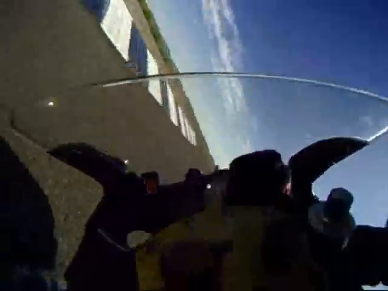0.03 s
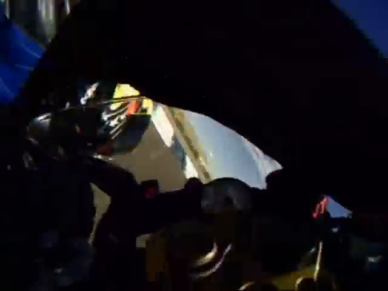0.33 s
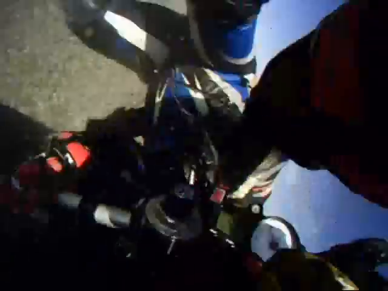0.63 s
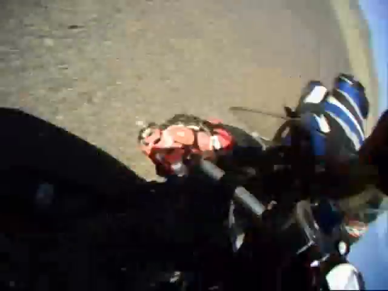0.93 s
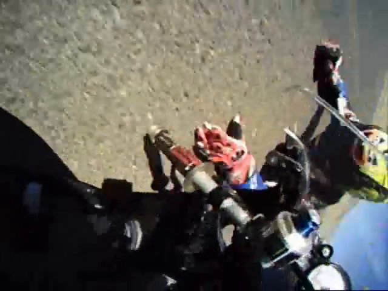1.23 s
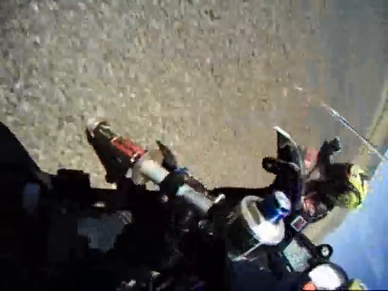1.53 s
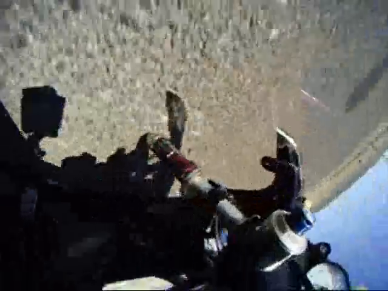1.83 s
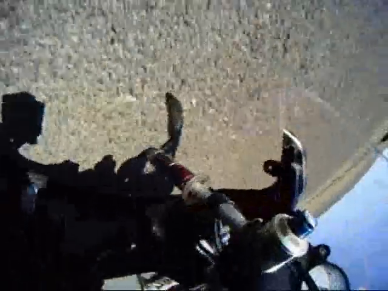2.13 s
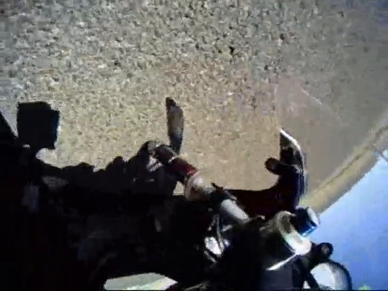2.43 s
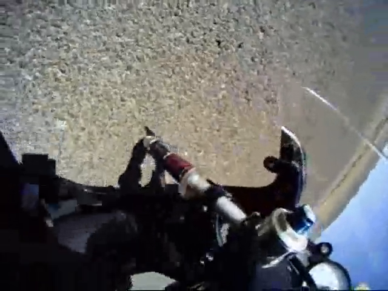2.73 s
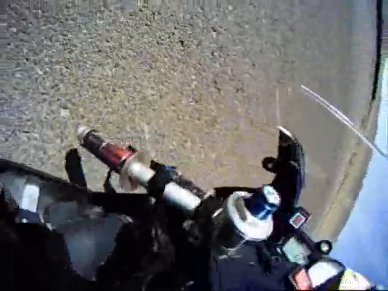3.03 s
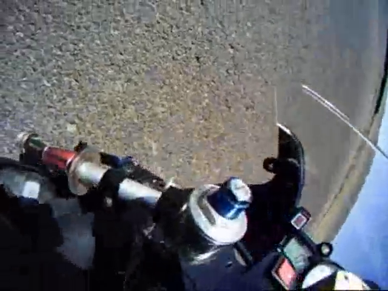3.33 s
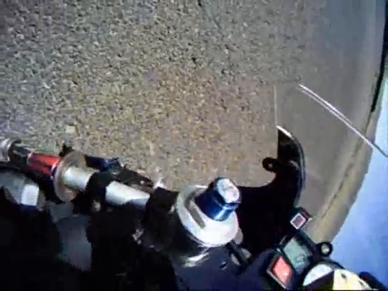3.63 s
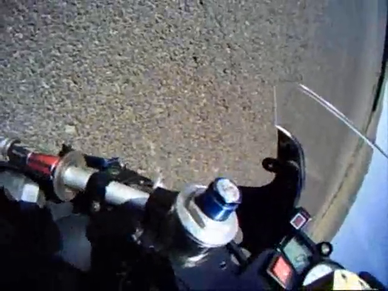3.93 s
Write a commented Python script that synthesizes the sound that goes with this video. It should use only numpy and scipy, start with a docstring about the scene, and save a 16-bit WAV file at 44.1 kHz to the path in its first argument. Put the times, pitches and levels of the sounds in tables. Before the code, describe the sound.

A motorcycle crashes and slides on asphalt, heard from on the bike. Wind and a fast, crackling judder overload the microphone until 0.5 seconds, when crunching slams begin, choking the sound between blows. From 1 second metal grinds and rattles over booming bodywork, squealing briefly around 1.2 and scraping hardest near 1.6. After 2 seconds the slide breaks into separate scrapes and low bumps, dying away by 4 seconds.

```python
"""A racing motorcycle falls and slides along asphalt, heard from a camera on the bike.
First wind and a fast judder overload the microphone. From half a second the bike slams down in a run
of blows that choke the sound, and an edge gouges the track. From one second the dragged metal grinds,
rings and briefly squeals while the bodywork booms. Last, the bike bumps and rocks to rest."""
import sys
import numpy as np
from scipy.fft import rfft, irfft, next_fast_len
from scipy.io import wavfile
from scipy.ndimage import map_coordinates

SR = 44100
rng = np.random.default_rng(int(sys.argv[2]) if len(sys.argv) > 2 else 0)


def wrap_up_sound(samples):
    """Save the sound to the file named by the first command line argument, as 16-bit audio."""
    columns = np.atleast_2d(samples).T
    # keep every value between -1 and 1, then stretch to whole-number steps
    tamed = np.clip(columns, -1, 1)
    steps = np.round(tamed * 32767).astype(np.int16)
    wavfile.write(sys.argv[1], SR, steps)


N = 176400

# The bike bumps on its side. Each row: start in seconds, swing in dB, time to fall 60 dB in seconds.
BUMPS = [(1.887, -35, 0.091), (2.075, -19, 1), (2.551, -1, 0.047), (2.587, -9, 0.095), (2.709, -10, 0.18),
         (2.772, -3.5, 0.13), (2.96, -2, 0.12), (3.029, -10.5, 0.31), (3.312, -11, 0.25),
         (3.379, -6.5, 0.59), (3.592, -23, 0.23), (3.721, -21, 0.42)]
# Spectrum of crunching and gouging. Each row: frequency in Hz, level in dB.
CRUNCH_SPECTRUM = [(100, 3), (400, 3), (1500, -2.5), (3500, -7.5), (6000, -17), (12000, -20.5)]


def slide():
    """Sliding friction: bumps and snags raise the contact pressure, and with it grinding and rattle."""
    # Course of the slide. Each row: time in seconds, grinding in dB, boom in dB.
    levels = [(1.03, -26, -13), (1.46, -27.5, -15), (1.51, -19.5, -8.5), (1.55, -30, -18.5),
              (1.59, -23, -6), (1.69, -22, -8.5), (1.77, -31, -18), (1.95, -32, -13.5), (2.02, -43, -31),
              (2.12, -37, -20), (2.34, -43.5, -27), (2.39, -30.5, -15), (2.5, -54.5, -36.5),
              (2.78, -56, -36), (2.93, -68.5, -61.5), (2.98, -36.5, -19), (3.06, -35, -19),
              (3.18, -67.5, -49.5), (3.32, -60.5, -49.5), (3.39, -33.5, -17), (3.51, -53.5, -41.5),
              (4, -61.5, -57)]
    # The metal snags on stones. Each row: start in seconds, level in dB.
    stones = [(1.134, -14), (1.424, -6.5), (1.610, -6), (1.677, -15), (1.695, -14.5), (1.894, -13.5),
              (1.901, -33), (1.953, -15.5), (2.040, -24.5), (2.081, -19), (2.121, -22), (2.145, -19.5),
              (2.232, -17), (2.375, -13), (2.419, -21), (2.981, -24), (3.036, -21.5), (3.053, -17),
              (3.359, -17.5), (3.379, -12), (3.402, -21), (3.422, -23.5)]
    grind_db, boom_db = curves(levels)
    landing = amp(73.5 * np.minimum(clock() - 0.99, 0))  # swells until 0.99 s
    scrapes = sum(amp(db - 31) * surge(s, rise_s=0.0032, fall_s=0.012) for s, db, _ in BUMPS)
    snags = sum(amp(db) * surge(s, rise_s=0.00098, fall_s=0.0036) for s, db in stones)
    pressure = amp(grind_db) + scrapes + snags
    flex, boom = bodywork()
    return landing * (pressure * grinding(flex) + rattle(pressure) + amp(boom_db) * boom)


def bodywork():
    """Panel vibration: the bodywork flexes at a wandering pitch. Returns the flexing and its boom."""
    # Centre pitch of the boom. Each row: time in seconds, frequency in Hz.
    pitches = [(1.03, 128), (1.66, 124.2), (1.77, 90), (3.03, 124.7), (3.4, 129.8)]
    # Rumble of the bodywork. Each row: frequency in Hz, level in dB.
    spectrum = [(30, -7), (70, 2), (150, 1), (220, -11.5), (320, -18), (1500, -55)]
    hz, = curves(pitches)
    flex = np.sin(2 * np.pi * np.cumsum(hz * (1 + 0.2007 * wobble(70))) / SR)
    tone = unit(flex * amp(2.7 * wobble(40)))
    return flex, amp(-2) * tone + amp(-1) * noise(spectrum)


def grinding(flex):
    """Forced resonance: stones rasp and ring the dragged metal, modulated by the flexing bodywork."""
    # Rasp of the asphalt. Each row: frequency in Hz, level in dB.
    spectrum = [(150, -2.5), (300, 1.5), (750, -8), (1000, -7), (1500, -2.5), (2500, -6.5), (4000, -16.5),
                (6000, -14), (12000, -33)]
    # Modes of the dragged parts. Each row: frequency in Hz, bandwidth in Hz, level in dB.
    modes = [(744, 61, -0.5), (1170, 76, -4.5), (1590, 33, 2.5), (2415, 145, -7), (5510, 390, -16),
             (6450, 55, -13), (7930, 34, -7.5), (9570, 130, -12.5), (10260, 400, -16)]
    rasp = grit(per_s=2500, spread_db=12) + 0.98 * rng.standard_normal(N)
    rasp *= amp(3.5 * flex + 5 * np.tanh(wobble(110)))  # chatter
    return amp(-2.5) * coloured(rasp, spectrum) + amp(-7.5) * ringing(rasp, modes)


def impacts():
    """Impulsive forces: slams push in alternate directions. Returns thuds and the crunch envelope."""
    # The bike hits the track. Each row: start in seconds, thud in dB, crunch in dB.
    slams = [(.533, 0.5, -12.5), (.567, -0.5, -11.5), (.590, -9.5, -19.5), (.689, 6, -15.5),
             (.694, 1.5, -12), (.702, -7, -9), (.735, -0.5, -9.5), (.778, -1.5, -18.5), (.799, -10, -20),
             (.805, 1, -10.5), (.843, 1.5, -16.5), (.919, -2.5, -16), (.945, -4, -6.5), (.954, 1.5, -24),
             (.961, -9, -17.5), (.981, 3, -29.5), (.992, -16, -11), (1.010, -0.5, -10), (1.031, -9, -19),
             (1.044, -4.5, -13), (1.927, 6.5, -14), (2.145, -4, -34), (2.373, -0.5, -18.5)]
    # Jolts overload the microphone with sharp cracks. Each row: start in seconds, level in dB.
    cracks = [(0.096, -13), (.130, -14.5), (0.171, -11), (0.187, -6.5), (.262, -8), (0.304, -12.5),
              (0.336, -9.5), (0.352, -7.5), (0.36, -10.5), (.373, -8.5), (0.393, -6), (.411, -6.5),
              (0.426, -11), (0.452, -7), (0.466, -7.5), (1.503, -11.5), (1.511, -10), (1.518, -5.5),
              (1.575, -8.5), (1.585, -11), (1.594, -7), (1.639, -9), (1.655, -11.5), (1.660, -5.5),
              (1.665, -8), (1.673, -9), (1.699, -14)]
    # Hollow knocks of the bodywork. Each row: start in seconds, frequency in Hz, level in dB.
    knocks = [(.567, 414, -3.5), (.778, 285, -8), (.919, 580, -8.5)]
    rise_s, hold_s, fall_s = 0.0011, 0.0027, 0.001
    crunch_s, crack_s, knock_s = 0.0034, 0.0024, 0.0017
    thuds, bursts = np.zeros(N), np.zeros(N)
    t = np.arange(SR // 10) / SR
    push = np.minimum(t / rise_s, 1) * np.exp(-np.maximum(t - hold_s, 0) / fall_s)
    knock_envelope = t / knock_s * np.exp(1 - t / knock_s)
    for k, (s, thud_db, crunch_db) in enumerate(slams):
        thuds[round(s * SR):][:len(t)] -= (-1) ** k * amp(thud_db) * push
        bursts[round(s * SR):][:len(t)] += amp(crunch_db) * np.exp(-(t / crunch_s) ** 4)
    for s, db in cracks:
        bursts[round(s * SR):][:len(t)] += amp(db) * np.exp(-(t / crack_s) ** 4)
    for s, hz, db in knocks:
        thuds[round(s * SR):][:len(t)] += amp(db) * np.sin(2 * np.pi * hz * t) * knock_envelope
    return highpass(thuds, corner_hz=34.8), bursts  # each push springs back


def judder_and_wind():
    """Saturation: judder drives the microphone to its stop, thumping and muffling the rush of air."""
    # Overdrive of the microphone. Each row: time in seconds, drive in dB.
    drive = [(0, 8), (.08, 8), (.22, 7.5), (.29, 18.5), (.42, 14), (.48, -2.5), (.54, -10.5)]
    # Rush of air and road. Each row: time in seconds, level in dB.
    rush_levels = [(0, -22), (.08, -14), (.25, -16.5), (.4, -10), (0.518, -20.5), (.56, -29.5),
                   (0.662, -24.5), (.8, -23), (.89, -33), (.96, -54), (1.03, -21), (1.15, -45)]
    # Spectrum of the rush. Each row: frequency in Hz, level in dB.
    spectrum = [(60, -6.5), (170, 4.5), (450, -6.5), (900, -10), (1600, -12.5), (2500, -13.5), (4000, -25),
                (6000, -21), (12000, -29.5)]
    start_s, end_s, judder_hz = 0.0205, 0.545, 26.9
    drive_db, = curves(drive)
    rush_db, = curves(rush_levels)
    t = clock()
    swing = amp(drive_db) * np.sin(2 * np.pi * judder_hz * (t - start_s))
    buffet = amp(np.minimum(drive_db, 0)) * wobble(420)
    held = np.tanh((swing + buffet) * gate(start_s / 2, end_s, 0.0007))
    thumps = amp(-2) * highpass(held, corner_hz=66)
    openness = 1 - 0.93 * np.interp(t - 0.003, t, held) ** 2  # lags the swing by 3 ms
    rush = amp(rush_db + 10.1 * np.tanh(wobble(260))) * noise(spectrum)
    return thumps + gate(0, rush_levels[-1][0], 0.0032) * openness * rush


def gouge():
    """Impulse noise: an edge digs into the asphalt with a short, swelling run of snaps."""
    start_s, end_s, rise_db_per_s = 0.634, 0.667, 196
    swell = amp(-11 + rise_db_per_s * np.minimum(clock() - end_s, 0))
    snaps = coloured(grit(per_s=1600, spread_db=4), CRUNCH_SPECTRUM)
    return gate(start_s, end_s, 0.0072) * swell * snaps


def squeal():
    """Frictional vibration: the dragged metal holds a wavering tone with a thin fourth harmonic."""
    hz = 1545 * (1 + 0.0328 * (wobble(300) + wobble(30) / 2))
    phase = 2 * np.pi * np.cumsum(hz) / SR
    tone = np.sin(phase) + amp(-11) * np.sin(4 * phase)
    chatter_db = 6 * np.tanh(wobble(180)) + 4 * np.tanh(2 * wobble(60))
    return amp(-29) * gate(1.145, 1.35, 0.0093) * unit(tone * amp(chatter_db))


def rattle(pressure):
    """Impact excitation: loose parts buzz at their resonances, louder as the contact pressure grows."""
    # Modes of the loose parts. Each row: frequency in Hz, bandwidth in Hz, level in dB.
    modes = [(760, 99, 9), (1510, 87, -13), (8100, 75, 0)]
    return amp(-22.5) * pressure ** 0.71 * ringing(grit(per_s=1500, spread_db=-11), modes)


def rocking():
    """Damped oscillation: the heavy frame swings after each bump, over a deep rumble."""
    # Course of the deep rumble. Each row: time in seconds, level in dB.
    levels = [(0, -26.5), (2.5, -18), (2.9, -40), (3.25, -30), (3.82, -28.5), (4, -49)]
    # Its spectrum. Each row: frequency in Hz, level in dB.
    spectrum = [(8, -2), (22, 9.5), (50, 5), (90, -21), (300, -55.5)]
    rock_hz, rise_s = 37.04, 0.0024
    rumble_db, = curves(levels)
    sound = amp(rumble_db) * noise(spectrum)
    for s, db, t60 in BUMPS:
        t = np.maximum(clock() - s, 0)
        envelope = amp(db - 60 * t / t60) * (1 - np.exp(-t / rise_s))
        sound += envelope * np.sin(2 * np.pi * rock_hz * t)
    return sound


def amp(db):
    """Decibels to gain."""
    return 10 ** (np.asarray(db) / 20)


def unit(x):
    """Normalisation to rms 1."""
    return x / np.sqrt(np.mean(x ** 2) + 1e-20)


def clock():
    """Time of each sample in seconds."""
    return np.arange(N) / SR


def curves(rows):
    """Linear interpolation of each column after the time, one value per sample."""
    times, *columns = np.transpose(rows)
    return [np.interp(clock(), times, column) for column in columns]


def wobble(rate):
    """Smooth random modulation, rate knots a second."""
    return map_coordinates(rng.standard_normal(8192), [clock() * rate], mode="wrap")


def gate(start, end, edge_s):
    """A soft-edged time window from start to end."""
    return (np.tanh((clock() - start) / edge_s) - np.tanh((clock() - end) / edge_s)) / 2


def surge(start, rise_s, fall_s):
    """A quick rise and an exponential decay from start on."""
    t = np.maximum(clock() - start, 0)
    return (1 - np.exp(-t / rise_s)) * np.exp(-t / fall_s)


def filtered(x, response):
    """Linear filtering: the spectrum of x times a complex response of frequency."""
    size = next_fast_len(N + SR // 2)
    return irfft(rfft(x, size) * response(np.fft.rfftfreq(size, 1 / SR)), size)[:N]


def highpass(x, corner_hz):
    """First-order high-pass: a steady push relaxes to zero."""
    return filtered(x, lambda hz: 1j * hz / (corner_hz + 1j * hz))


def coloured(x, points):
    """Spectral shaping of x by (Hz, dB) points, at rms 1."""
    f, db = np.transpose(points)
    return unit(filtered(x, lambda hz: amp(np.interp(np.log(hz + 1), np.log(f + 1), db))))


def ringing(x, modes):
    """Resonance: x drives parallel damped modes, at rms 1."""
    def response(f):
        return sum(amp(db) * 1j * f * width / (hz * hz - f * f + 1j * f * width)
                   for hz, width, db in modes)
    return unit(filtered(x, response))


def noise(points):
    """Coloured Gaussian noise of rms 1."""
    return coloured(rng.standard_normal(N), points)


def grit(per_s, spread_db):
    """Shot noise: random snaps of uneven size, at rms 1."""
    snaps = (rng.random(N) < per_s / SR) * rng.standard_normal(N)
    return unit(snaps * amp(spread_db * rng.uniform(-1.1, 1, N)))


def scene():
    """Superposition: wind, slide and rocking choke between blows and break up under each crunch."""
    # Moments when the sound chokes. Each row: start in seconds, end in seconds, gain in dB.
    chokes = [(0.552, 0.581, -16), (0.581, 0.625, -28), (0.672, 0.697, -50.5), (0.713, 0.753, -24.5),
              (0.751, 0.785, -46), (0.818, .835, -28), (0.857, 0.875, -40), (0.985, 1.028, -22.5)]
    choke_db = sum(db * gate(start, end, 0.0006) for start, end, db in chokes)
    thuds, bursts = impacts()
    body = amp(choke_db) * (judder_and_wind() + slide() + rocking()) + thuds
    flicker = (1 + np.tanh(4 * wobble(1400))) / 2
    breaks = np.clip(1.91 * bursts, 0, 1) * flicker
    crunch = bursts * unit(np.tanh(noise(CRUNCH_SPECTRUM)))
    return (body * (1 - breaks) + crunch + gouge() + squeal())[None]


def record(dry):
    """Saturation and band limiting: the camera flattens the peaks and cuts the highest treble."""
    hardness, top_hz = 45, 12600
    limited = dry[0] / (1 + np.abs(dry[0]) ** hardness) ** (1 / hardness)
    return filtered(limited, lambda hz: hz < top_hz)[None]


dry = scene()
out = record(dry)
wrap_up_sound(out)
```